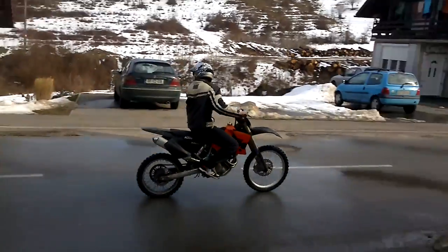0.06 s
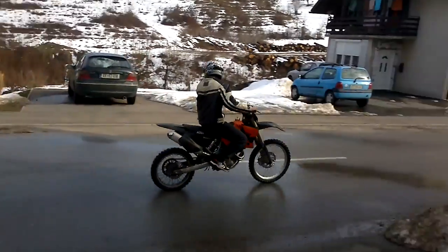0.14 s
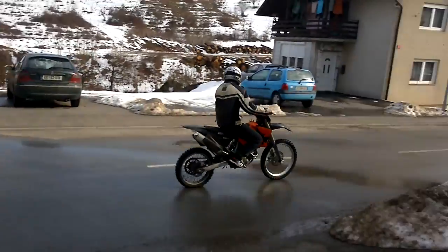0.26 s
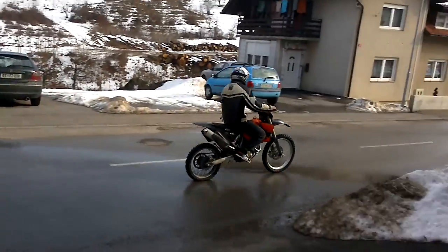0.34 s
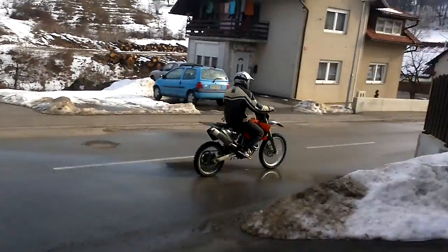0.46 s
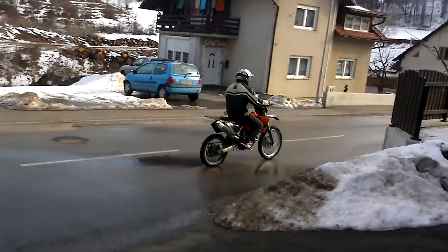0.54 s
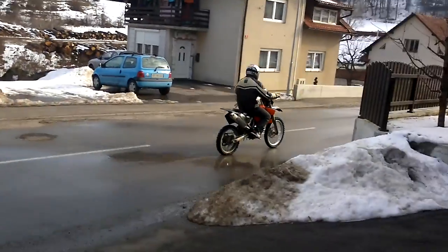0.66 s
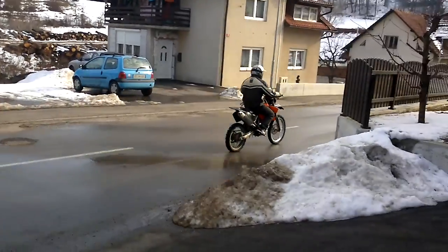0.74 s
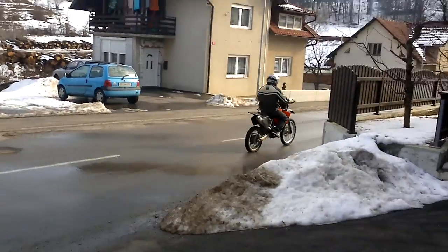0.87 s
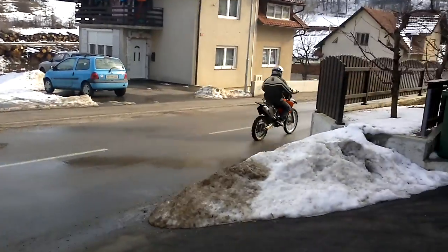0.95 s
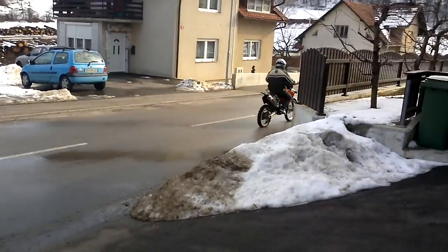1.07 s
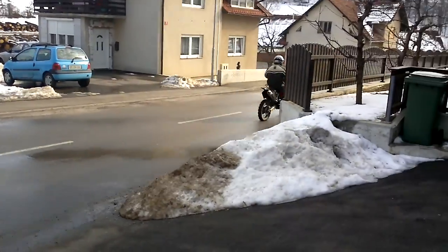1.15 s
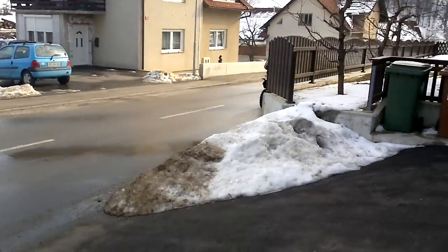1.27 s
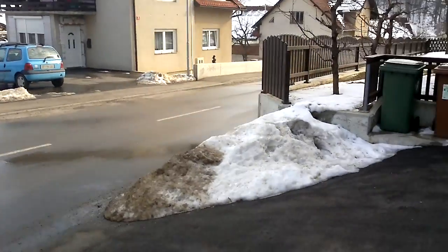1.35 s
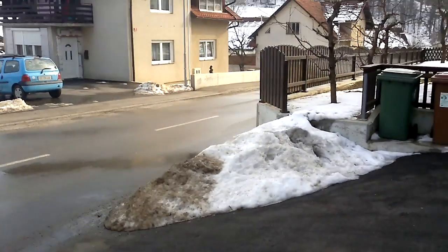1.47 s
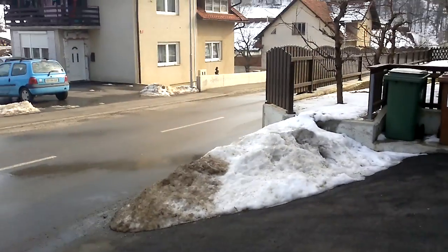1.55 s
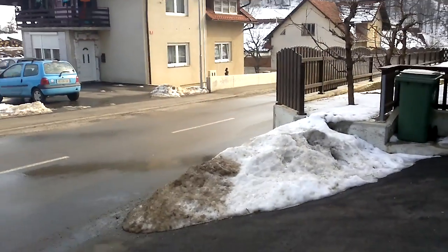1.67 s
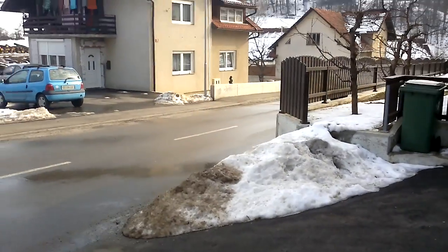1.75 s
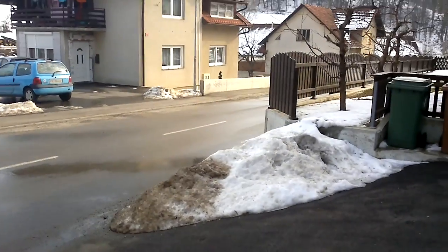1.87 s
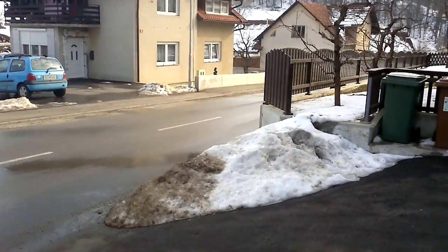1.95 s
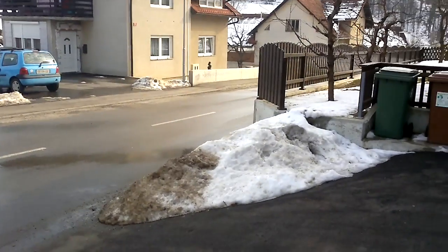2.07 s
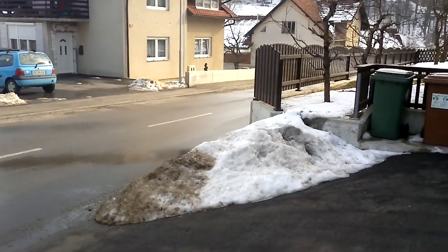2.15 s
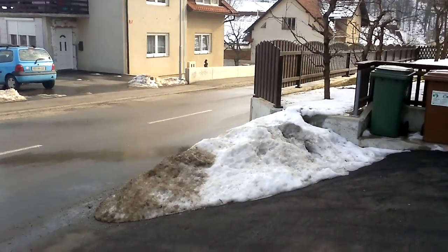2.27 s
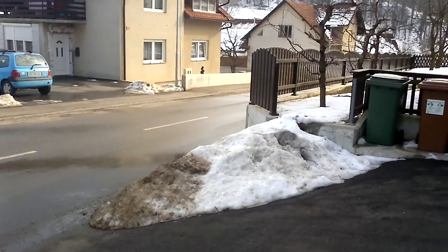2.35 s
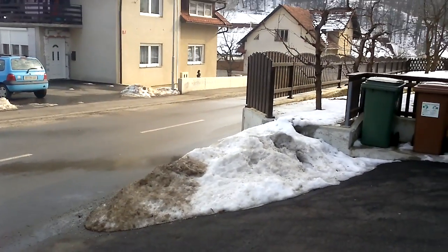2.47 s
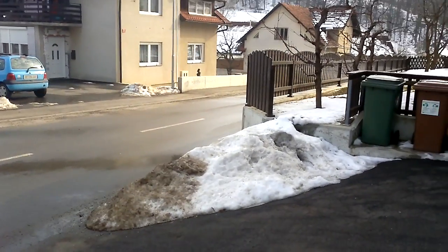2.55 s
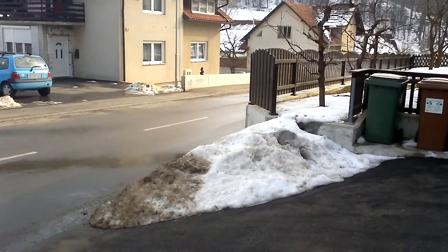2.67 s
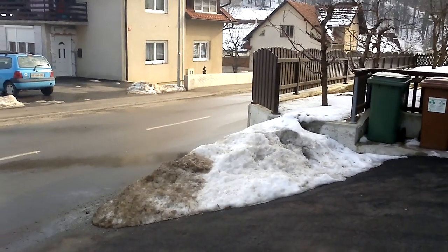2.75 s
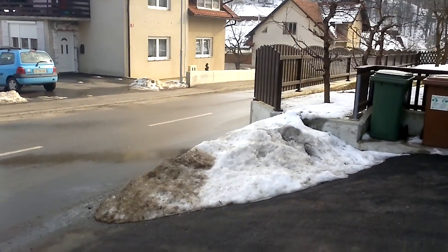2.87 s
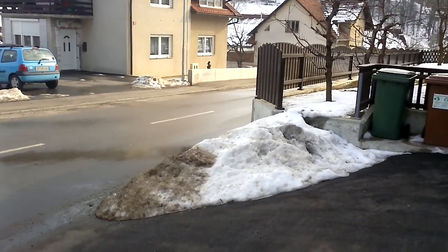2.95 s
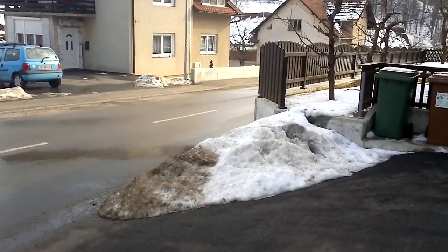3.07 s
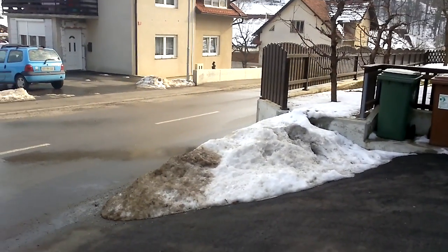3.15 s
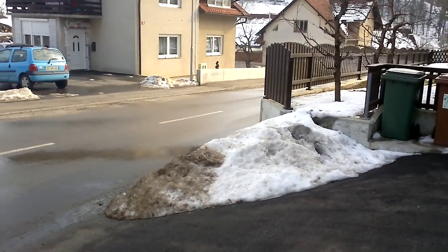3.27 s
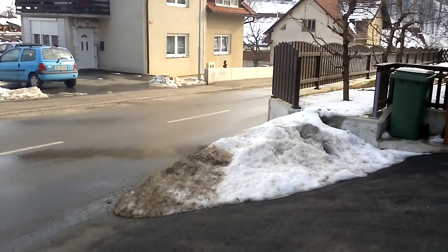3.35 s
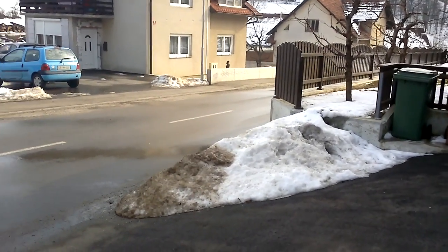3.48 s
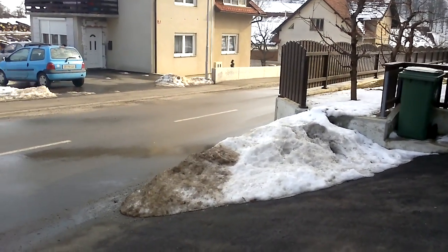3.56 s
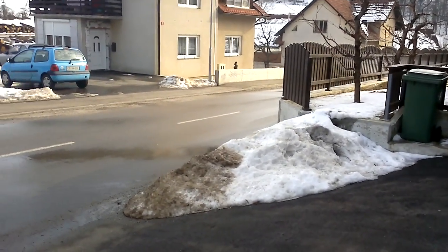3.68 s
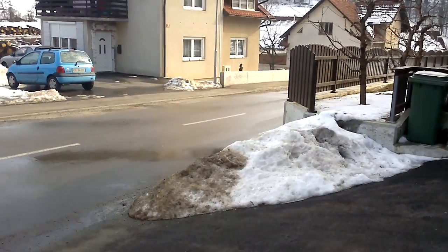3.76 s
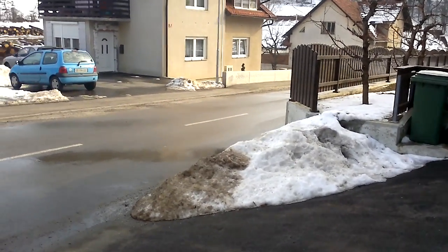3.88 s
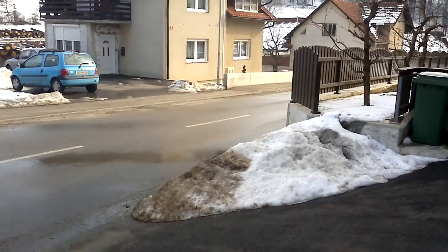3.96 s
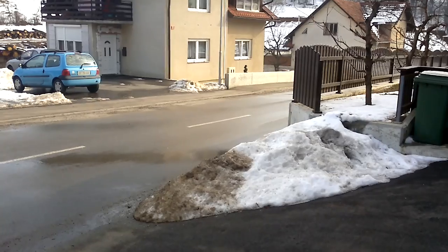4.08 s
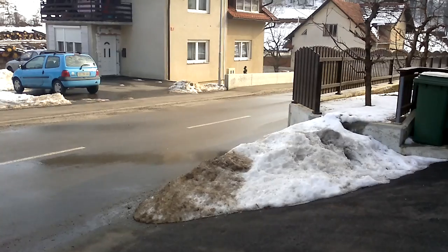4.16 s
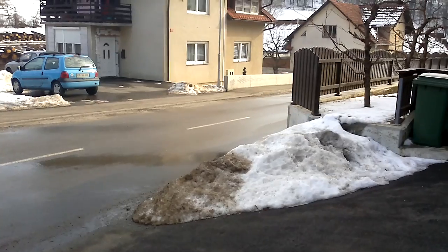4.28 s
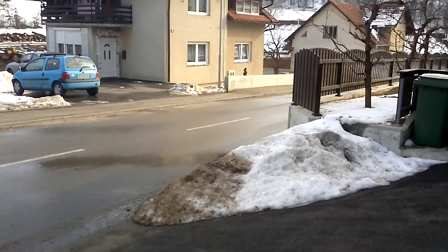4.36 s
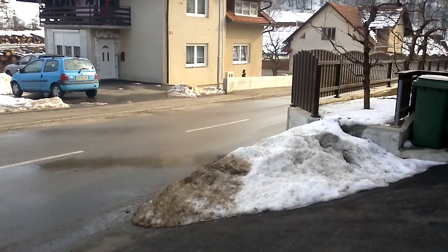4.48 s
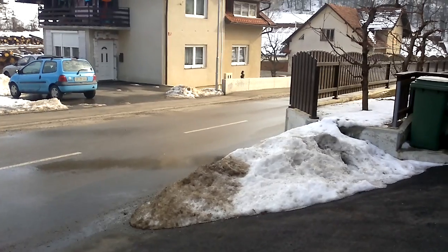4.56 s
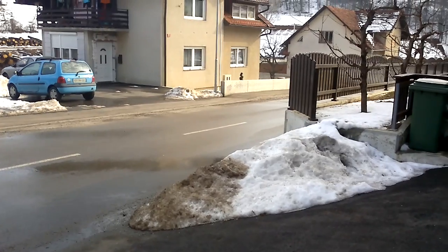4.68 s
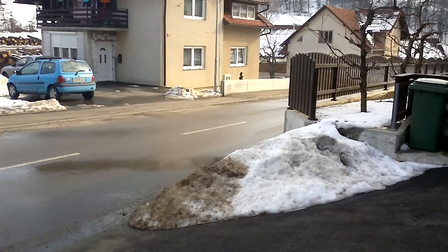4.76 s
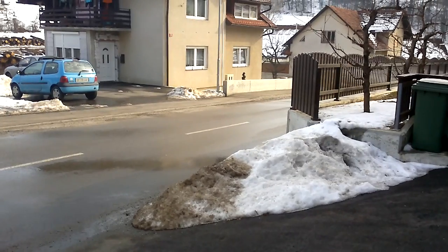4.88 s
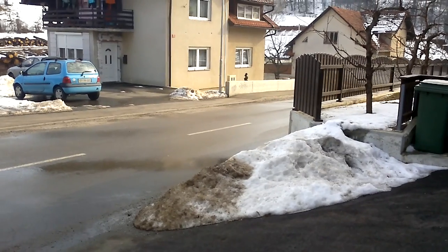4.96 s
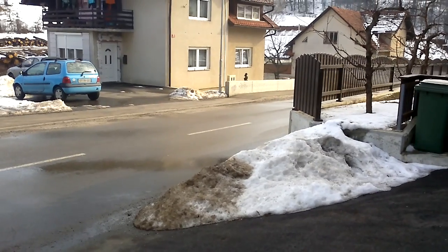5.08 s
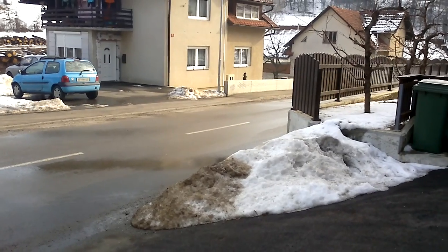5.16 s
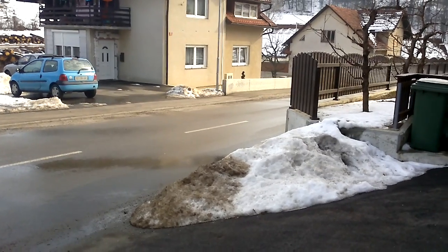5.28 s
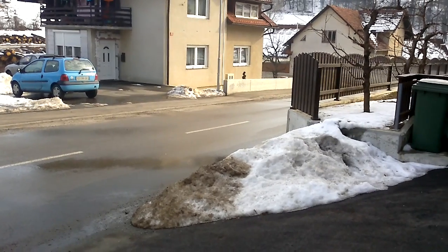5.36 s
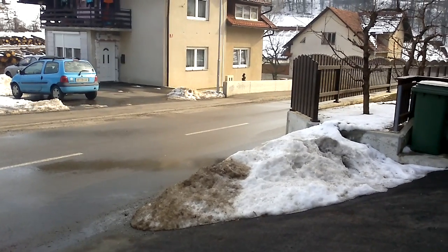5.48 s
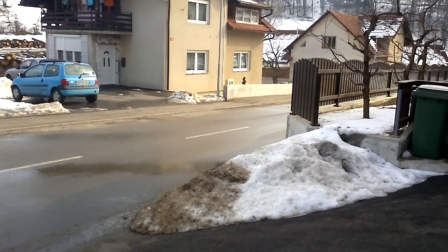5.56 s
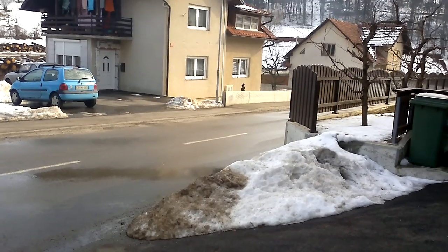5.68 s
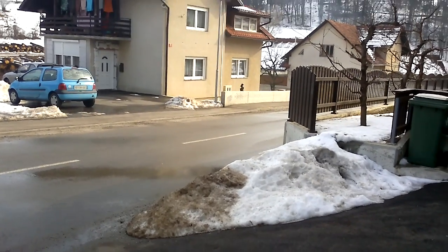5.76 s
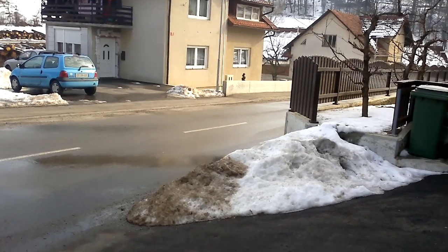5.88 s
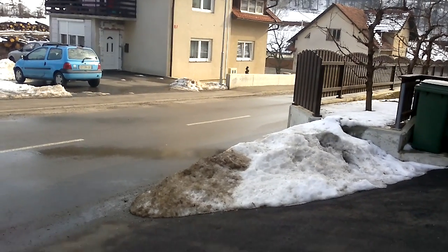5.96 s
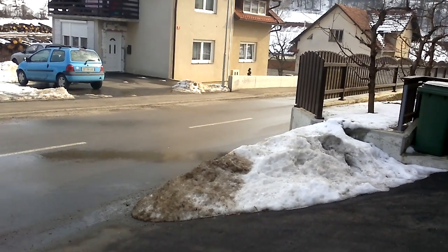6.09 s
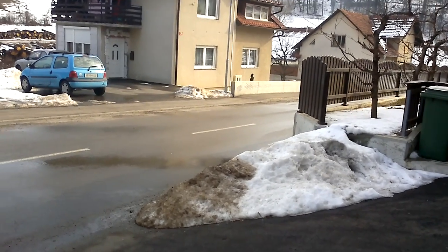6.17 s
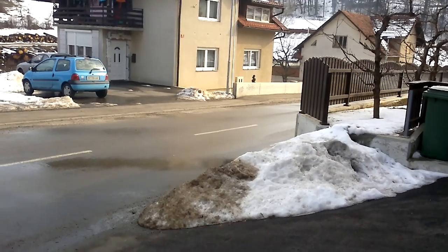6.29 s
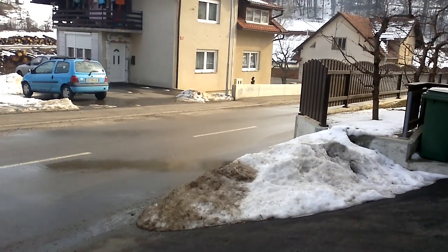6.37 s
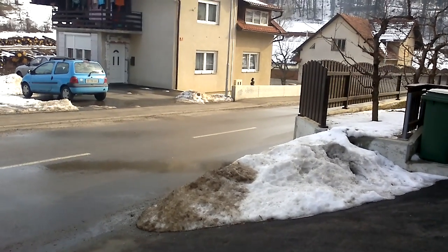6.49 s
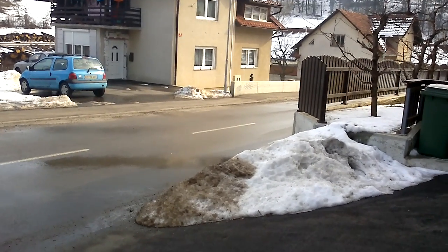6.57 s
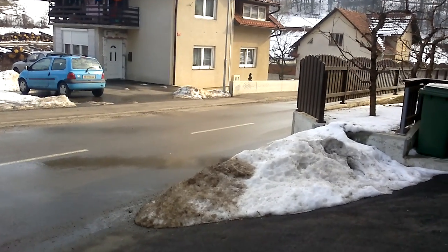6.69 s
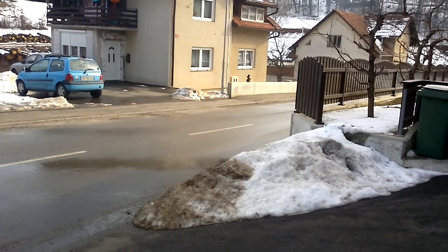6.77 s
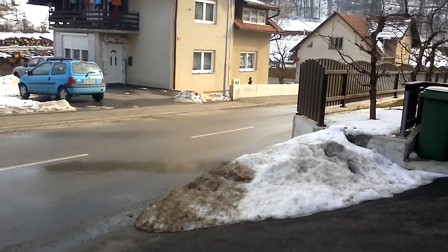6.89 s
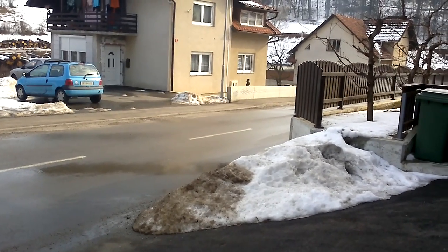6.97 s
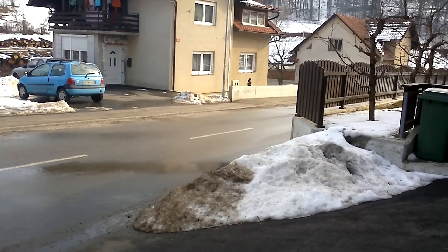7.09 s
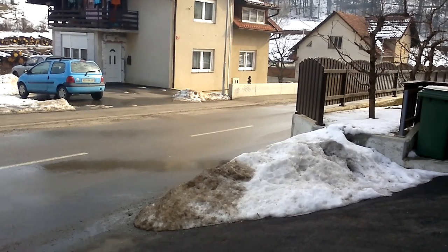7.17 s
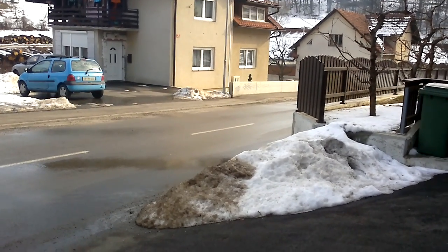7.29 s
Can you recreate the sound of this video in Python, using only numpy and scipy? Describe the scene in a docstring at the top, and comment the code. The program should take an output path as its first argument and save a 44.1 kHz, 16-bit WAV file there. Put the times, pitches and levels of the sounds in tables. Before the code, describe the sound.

At 0 s a single-cylinder four-stroke dirt bike is already close and loud: a deep, fast thumping blat of about 33 firings a second, with raspy clatter, gritty sliding noise and bright wet tyre hiss. Over the first second the bright noise drops sharply as it pulls away. A hard crack on the microphone body comes at 1.1 s, a lighter tick at 1.4, and faint water swishes near 1.5, 1.8 and 2.1. Revs climb slightly until 2.6 s, when the throttle shuts; a short swell at 2.8 cuts off abruptly as the gear engages. From 2.9 to 4.2 s the beat lopes, strong and weak, with a hollow boom near 3.1. Then it becomes a steadier, lower, muffled drone, blurred by street echoes, its hiss flickering out. Dull handling knocks and short rough scuffs occur around 5.95-6.5 s. The distant engine keeps fading to the end at 7.3 s.

```python
"""A thumping single-cylinder four-stroke dirt bike rolls past a hand-held camera and away down a wet street
between houses. Each firing rings the exhaust as a set of orders; gas and engine clatter puff once a cycle, in noise.
After a gear change near 2.65 s strong and weak firings alternate for a while. Wet tyres hiss, gritty noise bands
slide, water swishes; close by, the camera body ticks (a knock and a crack) and something scuffs (shaped noise)."""
import sys
import numpy as np
from scipy import signal
from scipy.fft import rfft, irfft
from scipy.io import wavfile
from scipy.ndimage import uniform_filter1d

SR = 44100
rng = np.random.default_rng(int(sys.argv[2]) if len(sys.argv) > 2 else 0)


def rack_gain(trim_db):
    """Turn a fader trim in dB into the linear factor to multiply a signal by."""
    fader = np.asarray(trim_db, float)
    return 10 ** (fader / 20)


def store_wav(level_fs):
    """Save 16-bit WAV to argv[1]."""
    pcm = np.round(np.clip(np.atleast_2d(level_fs), -1, 1) * 32767)
    wavfile.write(sys.argv[1], SR, pcm.T.astype(np.int16))


N = 323694
T = np.arange(N) / SR  # s
HZ = np.maximum(np.arange(N // 2 + 1) * SR / N, 1)  # spectral lines

SHIFT_S, CLUTCH_S = 2.58, 0.12  # the throttle shuts for the gear change, and how long that takes
BLIP_S = 2.772  # peak of a swell that cuts short as the gear engages
LOPE_S = 2.85  # strong and weak firings begin to alternate


def ramp(start_s, length_s):
    """A straight rise from 0 to 1."""
    return np.clip((T - start_s) / length_s, 0, 1)


def walk(rate):
    """Random levels held 1 / rate s and slewed twice; spread near 1."""
    k = int(SR / rate)
    held = np.repeat(rng.standard_normal(N // k + 1), k)
    return 4 / 3 * uniform_filter1d(uniform_filter1d(held, k), k)[:N]


def unit(x):
    """Scale to rms 1."""
    return x / np.sqrt(np.mean(x ** 2))


def table(points):
    """A (Hz, value) table read at every spectral line, along log frequency."""
    hz, value = np.transpose(points)
    return np.interp(np.log(HZ), np.log(np.maximum(hz, 1)), value)


def band(x, colour, lo_hz, hi_hz):
    """One soft-edged slice of a coloured spectrum, rms 1."""
    edge = 1 / np.sqrt((1 + (lo_hz / HZ) ** 8) * (1 + (HZ / hi_hz) ** 8))
    return unit(irfft(rfft(x) * rack_gain(table(colour)) * edge, N))


def ring(x, hz, width_hz):
    """A resonance applied twice, so that its skirts are steep."""
    g, k = np.tan(np.pi * hz / SR), width_hz / hz
    b = [k * g, 0, -k * g]
    a = [1 + k * g + g * g, 2 * g * g - 2, 1 - k * g + g * g]
    return signal.lfilter(b, a, signal.lfilter(b, a, x))


def engine():
    """Firing rate in Hz and the running count of firings, its integral."""
    # engine pace along the street: time_s, firing_rate_hz
    pace = [(0, 33.8), (.2, 33.15), (.5, 32.75), (.75, 32.8), (.9, 32.25), (1, 33.35), (1.1, 32.45),
            (1.6, 34.2), (2, 35.7), (2.5, 36.65), (2.635, 36.55), (2.665, 34.5), (2.82, 33), (2.9, 34.25),
            (3.1, 34.2), (3.7, 31.8), (4.2, 31.75), (4.6, 30.85), (5, 30.35), (5.62, 30.7), (5.8, 28.8),
            (6, 30.85), (6.15, 30.1), (7.34, 30.6)]
    hz = np.interp(T, *np.transpose(pace))
    return hz, 1.08 + np.cumsum(hz) / SR


def order_levels():
    """Level of orders 1-7, balanced as the riding state demands; each wavers as the echoes shift."""
    # low orders: time_s, order_1_db, order_2_db, order_3_db, note_db (orders 4-7), tilt_db (per order)
    levels = [(0, -28.5, -35.5, -20.5, -18, -5.5), (0.248, -35.5, -26.5, -23, -16.5, -0.5),
              (0.549, -35, -29.5, -23.5, -16, -0.5), (1.1, -33, -28, -31.5, -20.5, -0.5),
              (1.801, -28, -31, -31.5, -22, 0.5), (2.4, -26, -32, -35, -23, -1.5),
              (2.61, -27.5, -25.5, -33, -29, 2), (2.7, -35, -29.5, -19, -29, 2.5),
              (2.9, -31.5, -30.5, -31, -29.5, 5.5), (3.1, -33.5, -33, -22, -26, 2.5),
              (3.28, -41, -36, -28.5, -23.5, 1.5), (3.62, -53, -45, -23.5, -24, -1),
              (3.8, -42.5, -32, -32.5, -28, 1), (4.151, -45, -31.5, -26.5, -27, 1),
              (4.7, -46, -31.5, -28.5, -27, -2.5), (5.199, -45.5, -32, -39.5, -26, -1),
              (5.801, -48, -39.5, -44, -28, -0.5), (6.5, -51, -33.5, -39.5, -29, 2.5),
              (7.34, -49.5, -33.5, -36.5, -37.5, 1)]
    # balance of orders 4-7 under throttle: relative level_db
    pulling = [-1.5, -6.5, -9.5, -21]
    # balance of orders 4-7 coasting after the gear change: relative level_db
    coasting = [4.5, -11, -12, -25]
    # balance of orders 4-7 far down the street: relative level_db
    distant = [1, 0.5, -10.5, -28]
    s, *columns = np.transpose(levels)
    *bass_db, note_db, tilt_db = (np.interp(T, s, c) for c in columns)
    shut, far = ramp(SHIFT_S, CLUTCH_S), ramp(3.66, 0.38)
    balance = np.outer(pulling, 1 - shut) + np.outer(coasting, shut - far) + np.outer(distant, far)
    middle_db = [db + note_db + k * tilt_db for k, db in enumerate(balance)]
    return [db + 1.84 * walk(7) for db in bass_db + middle_db]


def pipe_lag(order, hz):
    """Radians that an order lags as it passes the pipe resonance."""
    pipe_hz, pipe_width_hz = 129, 41.5
    return 2 * np.arctan2(pipe_width_hz * order * hz, pipe_hz ** 2 - (order * hz) ** 2)


def exhaust_orders(hz, turns, low_db, bark_db, centre_hz):
    """Harmonics of the firing rate, with slowly drifting phases, sound like one blown pipe."""
    # shape of the high orders: offset_hz (from their centre), relative level_db
    bark = [(-80.5, -11), (-7, 1), (31.5, -5), (74, -22)]
    bark_hz, bark_shape = np.transpose(bark)
    # the high orders come and go as the paths along the street shift
    high_db = [bark_db + np.interp(k * hz - centre_hz, bark_hz, bark_shape) + 2.5 * walk(4)
               for k in range(8, 14)]
    # under throttle the stroke is one compact thump: the high orders arrive together, the bass trails them
    shut = ramp(SHIFT_S, CLUTCH_S)
    late = .76 + .35 * ramp(1.5, 0.45)  # radians per order behind the firing, more as the bike draws off
    pipe = 0
    for k, db in enumerate(low_db + high_db, 1):
        thump = (1 - shut) * (late * k - 3 * (1 / k + 1 / 8))
        drift = (1.1 if k > 7 else .18) * walk(3)  # radians; echoes move the high orders most
        phase = 2 * np.pi * k * turns - shut * pipe_lag(k, hz) - drift - thump
        pipe = pipe + np.sqrt(2) * rack_gain(db) * np.cos(phase)
    return pipe


def firing_strength(turns):
    """Gain of each firing: strong and weak in turn for a while, chance scatter, and the blip of the shift."""
    count = np.arange(N // 500)
    swell = turns - 0.15
    loping = ramp(LOPE_S, 0.11) - ramp(4.2, 0.092)
    alternate = loping * (.3 - (.3 - .12) * ramp(LOPE_S + .2, 0.16))
    # chance is slightly larger after the shift until the pace steadies
    scatter = 0.1 + 0.01 * (ramp(LOPE_S, 1.) - ramp(5.0, .3))
    strength = 1 + alternate * np.interp(swell, count, (-1.) ** count)
    strength *= 1 + scatter * np.interp(swell, count, rng.standard_normal(len(count)))
    blip_db = np.interp(T - BLIP_S, [-0.09, 0, 0.021, 0.03948], [0, 6, -13, 0])
    return strength * rack_gain(blip_db)


def paired_firing(hz, turns):
    """Firing in pairs wakes a low tone at 1.5 times the rate; strong firings ring the pipe on at order 3.5."""
    pair = rack_gain(-31) * (ramp(LOPE_S, 0.38) - ramp(3.9, 0.084)) * np.cos(3 * np.pi * turns)
    boom = np.sqrt(2) * rack_gain(-26) * np.exp(-((T - 3.1) / 0.27) ** 2)
    return pair + boom * np.cos(7 * np.pi * turns - pipe_lag(7 / 2, hz))


def street_rumble(low_db):
    """Echoes from the house fronts blur into a rumble between the orders: noise that follows their level."""
    # rumble colour: frequency_hz, relative level_db (per Hz)
    colour = [(30, -13), (130, -8.5), (220, -8), (400, -23.5)]
    loud = np.sqrt(sum(rack_gain(db) ** 2 for db in low_db))
    rumble = [band(n, colour, 45, 320) for n in rng.standard_normal((2, N))]
    return rack_gain(-17) * loud * np.array(rumble)


def exhaust(hz, turns, bark_db, centre_hz):
    """Clean orders, each firing with its own strength, reach both ports alike; the rumble less so."""
    low_db = order_levels()
    pipe = firing_strength(turns) * exhaust_orders(hz, turns, low_db, bark_db, centre_hz)
    direct = pipe + paired_firing(hz, turns)
    return [direct, 0 * direct] + street_rumble(low_db)


def roar(phase, clatter_db):
    """Gas and valve clatter swell once a cycle; wet tyres hiss and spray; the colour changes with distance."""
    # colour close to the microphone: frequency_hz, relative level_db (per Hz)
    near_colour = [(300, -5.5), (450, -16.5), (800, -11), (1330, -10), (1900, -12.5), (2150, -17.5),
                   (2690, -19), (3270, -15), (4100, -19.5), (5200, -21.5), (6000, -24.5), (8130, -30.5),
                   (10600, -50), (16000, -77.5)]
    # colour far down the street: frequency_hz, relative level_db (per Hz)
    far_colour = [(300, -3), (400, -17), (660, -10), (800, -10), (1640, -16), (1950, -16), (2480, -36),
                  (2950, -24.5), (3750, -22), (5300, -34), (5900, -45.5), (7200, -41.5), (8130, -58.5),
                  (12000, -102)]
    # some puffs are harder; echoes blur them with distance
    gust = np.cos(2 * np.pi * (phase - .1)) * rack_gain(2.4 * walk(40) - 3.4 * T)
    far = np.interp(T, [2.4, 4.3], [0, np.pi / 2])  # equal-power crossfade angle
    # treble fades faster than the clatter: dB lost for each dB of clatter
    lost_db = clatter_db - clatter_db[0]
    hiss_db = -29.5 + 1.253 * lost_db
    # the bend screens the tyres; their hiss then flickers
    hidden_s = 4.45
    hiss_db = hiss_db - 11.5 * np.maximum(T - hidden_s, 0) + 4.4 * ramp(hidden_s, 0.89) * walk(24)
    spray_db = -41.5 + 1.9 * lost_db - 6.0 * ramp(4.5, .1)
    # the gas swells with the blip
    clatter_db = clatter_db + 4.5 * np.exp(-((T - BLIP_S + .012) / 0.03) ** 2)
    # level_db, depth of the puffs, lo_hz, hi_hz
    layers = [(clatter_db, 0.14, 330, 2300), (hiss_db, 0.24, 2300, 5900), (spray_db, 0.24, 5900, 15000)]
    out = 0
    for db, beat, lo_hz, hi_hz in layers:
        noise = rng.standard_normal((2, 2, N)) * (1 + beat * gust)
        near = np.array([band(n, near_colour, lo_hz, hi_hz) for n in noise[0]])
        away = np.array([band(n, far_colour, lo_hz, hi_hz) for n in noise[1]])
        out = out + rack_gain(db + .7 * walk(12)) * (np.cos(far) * near + np.sin(far) * away)
    return out


def sliding_grit(phase):
    """Gritty noise bands pulse at each firing; their pitch slides as the ground echo shifts with the passing bike."""
    # bands, soon fading: start_hz, slide_hz_per_s, width_hz, level_db (at the start), fade_db_per_s
    bands = [(1397, -800, 390, -29.5, -8), (3255, 301.5, 600, -41.5, -9), (5260, -400, 1200, -38, -13)]
    out = 0
    for start_hz, slide, width_hz, db, fade in bands:
        hz = np.maximum(start_hz + slide * T, 880)
        width = int(SR / width_hz)
        grit = uniform_filter1d(uniform_filter1d(rng.standard_normal((2, N)), width), width)
        pulse = (0.3 + 6 * phase * np.exp(-phase / 0.11)) * rack_gain(2.3 * walk(30))
        carrier = np.cos(2 * np.pi * np.cumsum(hz) / SR)
        out = out + rack_gain(db + fade * T) * unit(pulse * grit * carrier)
    return out


def ticks():
    """Each tick is a dull knock of the body and a millisecond of bright crack, carried straight to the ports."""
    # ticks: start_s, knock_db (before its decay), knock_hz, crack_db (peak), crack_hz, left_minus_right_db
    events = [(1.1132, -15, 1400, -11.5, 4600, -18), (1.4375, -23, 1300, -17, 5000, 10),
              (5.953, -14, 620, -25, 1400, -4), (6.068, -21, 600, -31, 1200, -5),
              (6.21, -20, 620, -33, 1200, -5), (6.2535, -18, 1000, -37, 4600, -2)]
    out, t = np.zeros((2, N)), T[:800]
    for s, knock_db, knock_hz, crack_db, crack_hz, pan_db in events:
        knock = np.sin(2 * np.pi * knock_hz * t) * np.exp(-t * knock_hz)  # dies in about one cycle
        snap = rng.standard_normal(800) * np.exp(-t / .0002)
        crack = ring(ring(snap, crack_hz, crack_hz), .75 * crack_hz, crack_hz)
        tick = rack_gain(knock_db) * knock + rack_gain(crack_db) * crack / np.abs(crack).max()
        first = int(s * SR)
        out[:, first:first + 800] += rack_gain(np.array([[pan_db], [-pan_db]]) / 2) * tick
    return out


def scuffs():
    """Short rough rubs near the camera: noise with a quick start, a hold, a fading tail."""
    # rubs: start_s, level_db, length_s (until the tail)
    rubs = [(5.955, -41.5, 0.075), (6.262, -41.5, 0.1), (6.375, -42, 0.09)]
    # rub colour: frequency_hz, relative level_db (per Hz)
    colour = [(500, -10), (1020, -5), (2000, -15.5), (2700, -18), (3050, -17), (3800, -14), (4500, -26.5),
              (5200, -24.5), (6200, -38), (7100, -27), (10600, -60.5)]
    gain = 0
    for s, db, length in rubs:
        tail = np.exp(-np.maximum(T - s - length, 0) / 0.016)
        gain = gain + rack_gain(db) * ramp(s, .02) * tail
    grit = rack_gain(1.7 * walk(90) + 0.82 * walk(8.7))
    return gain * grit * np.array([band(n, colour, 890, 15000) for n in rng.standard_normal((2, N))])


def splashes():
    """Brief bright swishes of thrown water: noise under bell-shaped swells."""
    # swishes: centre_s, level_db (at the centre), half_length_s
    swishes = [(1.518, -46, 0.056), (1.768, -49, 0.063), (2.106, -46.5, 0.063)]
    colour = [(1000, -4.0), (5500, 14.0), (15000, -37.0)]  # Hz, relative dB
    gain = sum(rack_gain(db) * np.exp(-((T - s) / length) ** 2) for s, db, length in swishes)
    return gain * np.array([band(n, colour, 6900, 15500) for n in rng.standard_normal((2, N))])


def ports(pair):
    """Two microphone ports hear a direct sound; an unrelated twin reaches the right port only."""
    # port balance: frequency_hz, left_minus_right_db
    port_db = [(100, 2), (300, 1), (890, -3), (1520, -1.5), (4480, 11.5), (8000, 8), (11000, 1)]
    # port phase: frequency_hz, left_lead_radians
    port_lead = [(100, 0), (780, .1), (1290, 1), (2150, 2.7), (2670, 4.1), (4400, 3.5), (8000, 3),
                 (11000, .3)]
    # likeness of the ports: frequency_hz, likeness (0-1)
    port_alike = [(40, .96), (200, .98), (500, .94), (1000, .85), (2000, .66), (8000, .5), (11000, .95)]
    direct, twin = rfft(pair)
    alike = np.clip(table(port_alike), 0, 1)
    right = alike * np.exp(-1j * table(port_lead)) * direct + np.sqrt(1 - alike ** 2) * twin
    tilt = rack_gain(table(port_db) / 2)
    return irfft(np.array([direct * tilt, right / tilt]), N)


def scene():
    """Everything airborne reaches the two ports; the ticks come through the body."""
    # the passing bike: time_s, clatter_db, high_orders_db, high_orders_centre_hz
    passing = [(0, -26, -37.5, 289), (0.602, -28.5, -36.5, 291), (.9, -33, -56, 300),
               (1.601, -35.5, -42.5, 339), (2.15, -34, -41, 356), (2.68, -34.5, -45, 326),
               (2.97, -34, -39, 261), (3.701, -38, -43.5, 249), (4.3, -37.5, -39, 242),
               (4.599, -39.5, -43, 285), (5.701, -42.5, -40.5, 277), (6.402, -40.5, -44.5, 288),
               (7.34, -48.5, -49, 300)]
    s, *columns = np.transpose(passing)
    clatter_db, bark_db, centre_hz = (np.interp(T, s, c) for c in columns)
    hz, turns = engine()
    phase = turns % 1
    bike = exhaust(hz, turns, bark_db, centre_hz) + roar(phase, clatter_db) + sliding_grit(phase)
    return ports(bike + splashes() + scuffs()) + ticks()


def top_cut(x):
    """Nothing passes above the cut-off."""
    return signal.sosfilt(signal.butter(12, 15700, fs=SR, output="sos"), x)


def record(dry):
    """Adds a faint electronic hiss, mostly shared by both channels."""
    colour = [(7000, -0.5), (10000, -2.0), (15000, -19)]  # Hz, relative dB
    mid, side = (band(n, colour, 2000, 16000) for n in rng.standard_normal(dry.shape))
    hiss = rack_gain(-77) * np.array([mid + .4 * side, mid - .4 * side])
    return top_cut(dry + hiss)


dry = scene()
out = record(dry)
store_wav(out)
```